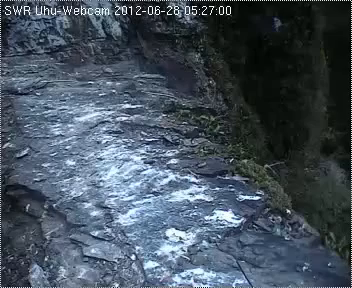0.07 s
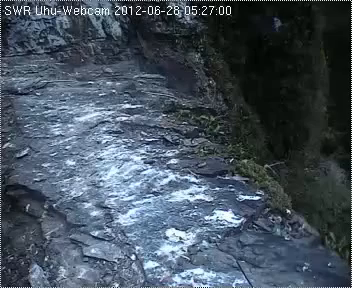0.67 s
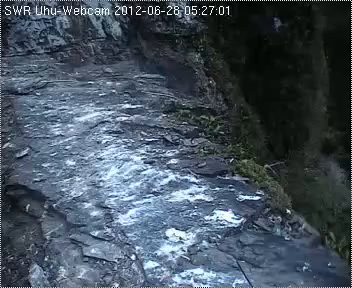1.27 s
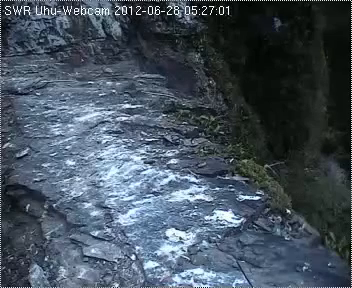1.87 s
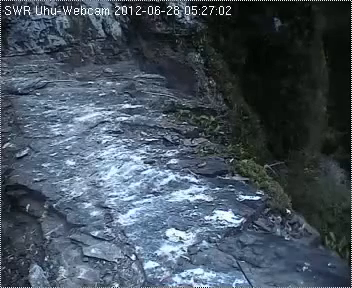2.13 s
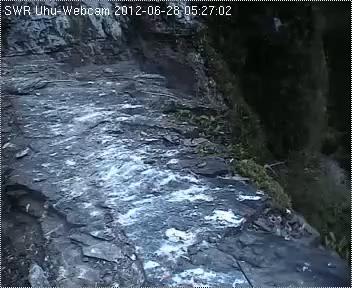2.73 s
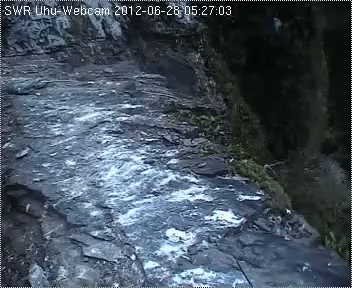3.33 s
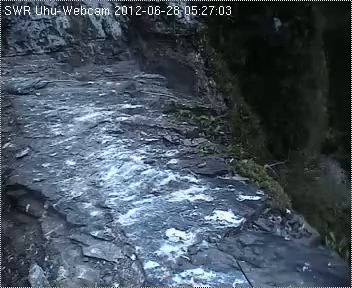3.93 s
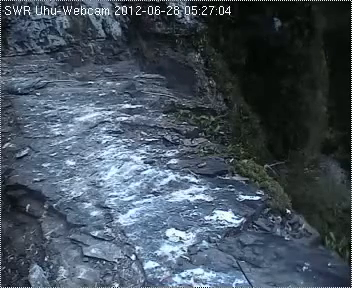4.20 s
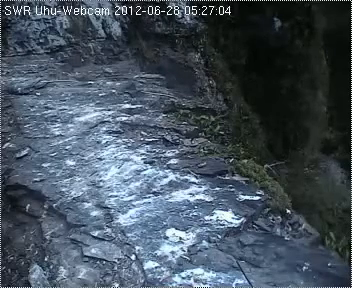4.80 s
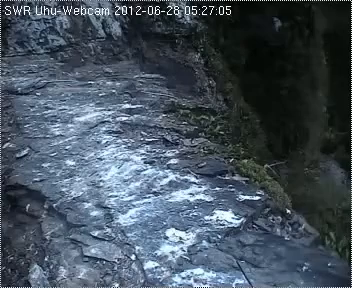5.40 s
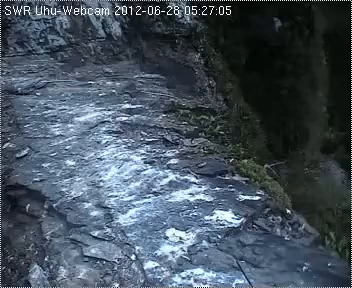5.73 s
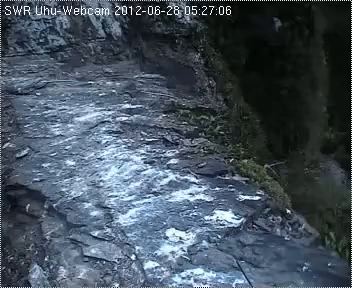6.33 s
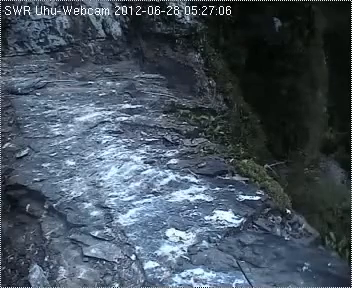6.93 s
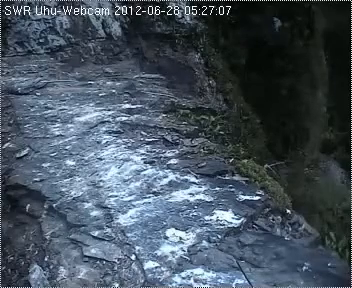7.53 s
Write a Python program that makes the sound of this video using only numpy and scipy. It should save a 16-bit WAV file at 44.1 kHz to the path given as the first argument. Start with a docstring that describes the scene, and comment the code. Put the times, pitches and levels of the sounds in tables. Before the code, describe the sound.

An owl gives one loud rasping screech and a softer hiss among small chirping birds, over steady rushing air and hum.

```python
"""A steady rush of air and mains hum, with distant song, on a rock ledge above a forest before dawn.
Two small birds repeat falling chirps that echo off the rock; faint owl rasps come from further off.
Midway a large owl gives one loud screech that overloads the microphone, then a softer hiss.
Owl calls are turbulent air, chopped by the syrinx and ringing in the throat; chirps and song are
gliding sines. A few scratchy ticks come near the end."""
import sys
import numpy as np
from scipy import signal
from scipy.fft import rfft, irfft
from scipy.io import wavfile

SR = 44100
rng = np.random.default_rng(int(sys.argv[2]) if len(sys.argv) > 2 else 0)


def dump_mix(stems):
    """Bounce the given channels to the path in sys.argv[1] as a 16-bit WAV at rate SR."""
    frames = np.atleast_2d(stems).T  # one column per channel
    limited = np.clip(frames, -1, 1)  # hard clip at full scale
    pcm = np.round(limited * 32767).astype(np.int16)
    wavfile.write(sys.argv[1], SR, pcm)


N = 337806
TIME = np.arange(N) / SR
FREQ_HZ = np.arange(N // 2 + 1) * SR / N
RASP_RISE_S, RASP_FALL_S = .067, .124

# Small birds' chirps. Each row: start in seconds, kind, held pitch in Hz, step down in Hz,
# length in seconds, relative level in dB.
CHIRPS = [(.594, "held", 3960, 30, .072, -36), (.93, "stepped", 5310, 1920, .083, -31),
          (1.324, "held", 4130, 100, .11, -34), (1.738, "held", 4680, 440, .088, -36),
          (2.153, "flat", 3820, 90, .097, -31), (2.546, "stepped", 5280, 1970, .086, -31.5),
          (2.97, "held", 3850, 20, .092, -29), (3.394, "stepped", 5080, 1680, .106, -34.5),
          (4.231, "held", 5060, 150, .056, -27.8), (4.602, "held", 4930, 150, .055, -32),
          (4.729, "flat", 4340, 30, .046, -32.5), (5.089, "held", 4970, 100, .055, -31),
          (5.104, "slurred", 4060, 500, .088, -34.5), (5.43, "slurred", 4030, 250, .078, -34),
          (5.467, "lifted", 4200, 1150, .097, -32.5), (5.746, "slurred", 4020, 520, .086, -32),
          (5.893, "held", 4890, 40, .046, -31), (6.029, "flat", 4320, 60, .044, -29.5),
          (6.093, "slurred", 4680, 530, .078, -33.8), (6.376, "stepped", 5550, 2250, .078, -32.5),
          (6.458, "slurred", 4660, 600, .08, -36), (6.787, "lifted", 4150, 820, .093, -30.5),
          (7.145, "lifted", 4500, 1050, .072, -37), (7.202, "held", 4950, 40, .061, -28),
          (7.521, "slurred", 4590, 750, .084, -37), (7.548, "stepped", 5420, 1960, .104, -34.5)]


def from_db(db):
    return 10 ** (np.asarray(db) / 20)


def unit_rms(x):
    return x / np.sqrt(np.mean(x ** 2) + 1e-20)


def drift(rate_hz):
    """Smooth random wander, rms 1."""
    return unit_rms(irfft(rfft(rng.standard_normal(N)) / (1 + (FREQ_HZ / rate_hz) ** 2), N))


def bumps(rows, rise_s, fall_s):
    """Gain of events that swell to a rounded peak and die away."""
    return sum(from_db(db) * np.exp(-((TIME - peak_s) / np.where(TIME < peak_s, rise_s, fall_s)) ** 2)
               for peak_s, db in rows)


def coloured(x, spectrum):
    """Shape x by (Hz, dB) points, rolling off beyond the ends; rms 1."""
    hz, db = np.transpose(spectrum)
    f = np.maximum(FREQ_HZ, 1)
    skirts = np.minimum(f / hz[0], 1) ** 3 * np.minimum(hz[-1] / f, 1) ** 4
    gain = from_db(np.interp(np.log(f), np.log(hz), db)) * skirts
    return unit_rms(irfft(rfft(x) * gain, N))


def resonate(x, hz, width_hz):
    """Two-pole resonance, peak gain 1."""
    r = np.exp(-np.pi * width_hz / SR)
    feedback = [1, -2 * r * np.cos(2 * np.pi * hz / SR), r * r]
    return signal.lfilter(np.array([1, 0, -1]) * (1 - r * r) / 2, feedback, x)


def air_rush():
    """Steady low rush of air with hollow resonances and a fine hiss on top."""
    # Spectra of rush and hiss. Each row: frequency in Hz, relative density in dB.
    rush_spectrum = [(25, -15.5), (45, -9), (65, 6.5), (90, 0), (130, 2.5), (175, 2.5), (240, 0.5),
                     (360, -2.5), (470, -5), (700, -8.5), (1100, -7), (1400, -11.5), (1800, -13.5),
                     (3200, -14.5)]
    top_spectrum = [(2500, -10), (3300, -3.5), (4300, -3), (5500, -3), (7000, -5.5), (8000, -6.5)]
    # Hollow resonances. Each row: centre in Hz, width in Hz, relative gain in dB.
    hollows = [(296, 32, -0.5), (466, 26, 1.5), (626, 12, -2), (844, 7.5, -8), (1099, 24, -7.5),
               (1486, 28, -8.5), (1908, 26, -7.5)]
    rush = from_db(-33.1 + .49 * drift(3)) * coloured(rng.standard_normal(N), rush_spectrum)
    air = rng.standard_normal(N)
    hollow = unit_rms(sum(from_db(db) * resonate(air, hz, width_hz) for hz, width_hz, db in hollows))
    top = coloured(rng.standard_normal(N), top_spectrum)
    return rush + from_db(-41.5) * hollow + from_db(-45.2) * top


def gusts():
    """Light gusts rumble, building faster than they die."""
    # Each row: peak time in seconds, level in dB.
    peaks = [(.6, -32.5), (3.7, -36), (4.99, -31.5)]
    # Each row: frequency in Hz, relative density in dB.
    spectrum = [(50, -15.5), (66, 7.5), (90, -4.5), (125, -3), (180, -13.5), (320, -22.5)]
    return bumps(peaks, rise_s=.19, fall_s=.32) * coloured(rng.standard_normal(N), spectrum)


def drone(hz=217, width_hz=32, floor_db=-39.5):
    """Low wavering band of noise, steady but for brief swells."""
    # Each row: peak time in seconds, level in dB.
    swells = [(.4, -35.5), (1.42, -32), (3.53, -29), (4.52, -31.5), (5.3, -33.5), (6.14, -32), (6.78, -35)]
    gain = np.hypot(from_db(floor_db), bumps(swells, rise_s=.1, fall_s=.1))
    band = resonate(rng.standard_normal(N), hz, width_hz)
    return gain * unit_rms(resonate(band, hz, width_hz))


def mains_hum():
    """Mains fundamental and third harmonic."""
    # Each row: frequency in Hz, rms level in dB.
    partials = [(50, -30.5), (150, -37.4)]
    return sum(np.sqrt(2) * from_db(db) * np.sin(2 * np.pi * (hz * TIME + rng.random()))
               for hz, db in partials)


def forest(x, t60_s):
    """Diffuse tail scattered back by trees and cliff."""
    t = TIME[:SR]
    tail = rng.standard_normal(SR) * from_db(-60 * t / t60_s) * (1 - np.exp(-t / .011))
    return signal.fftconvolve(x, tail / np.linalg.norm(tail))[:N]


def faint_song(count=90):
    """Note rows: a few clear notes over a random far chorus, the higher the fainter; the short falls at 0.72,
    6.21 and 6.58 s are the small birds' own after-notes."""
    # Each row: start in seconds, length in seconds, start and end pitch in Hz, relative level in dB.
    clear_notes = [(.17, .21, 3780, 3940, -48), (.33, .11, 3130, 3120, -43), (.48, .1, 4980, 4930, -48),
                   (.68, .047, 6070, 6400, -46), (.72, .035, 5740, 4700, -43),
                   (4.88, .088, 2850, 3350, -43), (6.21, .025, 4750, 4400, -44),
                   (6.58, .025, 4740, 4200, -41), (6.63, .06, 4210, 3920, -43),
                   (6.73, .074, 3550, 3620, -44), (6.94, .077, 3580, 3160, -44),
                   (7.12, .081, 3600, 3680, -43), (7.4, .11, 3300, 2900, -39)]
    when, length, octaves, glide, level = rng.random((count, 5)).T
    hz = 2700 * 2 ** octaves
    db = -52 + 3 * level - 5 * octaves
    chorus = zip(when * (TIME[-1] - .15), .05 + .1 * length, hz, hz * (.94 + .12 * glide), db)
    return list(clear_notes) + list(chorus)


def faint_notes(rows):
    """Thin, wavering glides, blurred by the trees."""
    notes = np.zeros(N)
    waver = 1 + .012 * drift(31)
    for start_s, length_s, from_hz, to_hz, db in rows:
        at = np.flatnonzero((TIME >= start_s) & (TIME < start_s + length_s))
        phase = 2 * np.pi * np.cumsum(np.linspace(from_hz, to_hz, len(at)) * waver[at]) / SR
        notes[at] += from_db(db) * signal.windows.tukey(len(at), .5) * np.sin(phase)
    return notes * from_db(2.5 + 3 * drift(40)) + forest(notes, t60_s=.4)


def small_birds(rise_s=.013, fade_s=.022, lift_s=.013, break_s=.006, break_db_per_octave=-9):
    """Each chirp swoops down to a held note, may lift a little, then steps down as it fades."""
    # Each row, by kind: top pitch in Hz, swoop in seconds, step position as a share of the length,
    # step time in seconds, lift in Hz, rock-bound over direct sound in dB.
    kinds = { "held": (6850, .0105, .78, .018, 0, -5), "flat": (6300, .011, .8, .018, 0, -9),
             "stepped": (7050, .0095, .62, .011, 130, -6), "lifted": (6700, .014, .84, .014, 430, -4),
             "slurred": (6000, .0115, 1.02, .018, 0, -19), }
    direct, to_rock = np.zeros(N), np.zeros(N)
    waver = 1 + .0066 * drift(70)
    flicker = from_db(1.7 * drift(60))
    for start_s, kind, held_hz, step_hz, length_s, db in CHIRPS:
        top_hz, swoop_s, step_share, step_s, lift_hz, echo_db = kinds[kind]
        at = np.flatnonzero((TIME >= start_s) & (TIME < start_s + length_s + fade_s / 2))
        t = TIME[at] - start_s
        since_step_s = t - step_share * length_s
        hz = held_hz + (top_hz - held_hz) * np.exp(-(t / swoop_s) ** 2)
        hz += lift_hz * np.exp(-(since_step_s / lift_s + 1) ** 2)
        hz -= step_hz * (1 + np.tanh(since_step_s / step_s)) / 2
        envelope = np.minimum(t / rise_s, 1) * np.clip((length_s + fade_s / 2 - t) / (2 * fade_s), 0, 1)
        # The voice breaks just before the step.
        break_db = break_db_per_octave * np.log2(held_hz / (held_hz - step_hz))
        envelope *= from_db(break_db * np.exp(-((since_step_s + step_s) / break_s) ** 2))
        phase = 2 * np.pi * np.cumsum(hz * waver[at]) / SR
        note = from_db(db) * envelope * flicker[at] * np.sin(phase)
        # A bird facing the rock sends less straight to the microphone.
        rock_ratio = from_db(echo_db)
        direct[at] += note / np.hypot(1, rock_ratio)
        to_rock[at] += note * rock_ratio / np.hypot(1, rock_ratio)
    echoes = from_db(-1) * rock_echoes(to_rock) + from_db(-2) * forest(to_rock, t60_s=.18)
    return from_db(3.5) * (direct + echoes)


def rock_echoes(x):
    """Close reflections off the rock faces."""
    # Each row: delay in seconds, relative gain in dB.
    reflections = [(.0021, -1), (.0053, 2.5), (.0097, -19.5), (.019, -7), (.034, -22)]
    return sum(from_db(db) * np.interp(TIME - delay_s, TIME, x, left=0) for delay_s, db in reflections)


def rasp(air, throat, ring_db, flutter_hz, roughness):
    """Turbulent air, chopped by the unevenly fluttering syrinx, rings in the throat; rms 1."""
    cycles = np.cumsum(flutter_hz * from_db(3.2 * drift(89.84))) / SR
    puffs = rng.standard_normal(N) * np.exp(roughness * np.cos(2 * np.pi * cycles))
    ringing = sum(from_db(db) * resonate(puffs, hz, width_hz) for hz, width_hz, db in throat)
    ringing = coloured(ringing, [(900, 4.5), (3000, -3.5), (4300, -8.5)])
    return unit_rms(coloured(puffs, air) + from_db(ring_db) * ringing)


def far_rasps():
    """Faint owl rasps from further off."""
    # Each row: peak time in seconds, level in dB.
    peaks = [(1.18, -46), (2.188, -29.7), (5.932, -25.3), (7.47, -37)]
    # Breath spectrum. Each row: frequency in Hz, relative density in dB.
    air = [(1400, -15), (2000, -11), (2380, 2.5), (2550, 0), (2900, -6.5), (3300, -1), (3800, -13.5),
           (5500, -16), (7500, -36.5)]
    # Resonances. Each row: centre in Hz, width in Hz, relative gain in dB.
    throat = [(2380, 40, 3), (2630, 40, -4), (2900, 180, -6)]
    voice = rasp(air, throat, ring_db=-5, flutter_hz=205, roughness=.25)
    return bumps(peaks, RASP_RISE_S, RASP_FALL_S) * voice


def after_notes(long_chirp_s=.087, delay_s=.122, length_s=.036, from_hz=4250, to_hz=4060):
    """Note rows: a faint falling note follows each long chirp."""
    return [(start_s + delay_s, length_s, from_hz, to_hz, db - 11)
            for start_s, *_, chirp_s, db in CHIRPS if chirp_s > long_chirp_s]


def owl_screech(jitter=.0185, hardening=1.1):
    """Loud rasp with a jittery whistle in it; the call hardens as the effort peaks."""
    # Each row: time in seconds, effort in dB.
    effort_curve = [(3.69, -41), (3.7, -34), (3.812, -9), (3.866, -6), (4.012, -12), (4.054, -21),
                    (4.075, -32)]
    # Each row: time in seconds, fundamental in Hz, whistle's relative level in dB.
    whistle_curve = [(3.69, 935, 4), (3.73, 935, -7), (3.78, 970, -8), (3.83, 1036, -1), (3.89, 1024, -3),
                     (3.95, 1078, -9), (4.02, 1040, -10), (4.048, 945, 3), (4.085, 930, -6)]
    # Breath spectrum. Each row: frequency in Hz, relative density in dB.
    air = [(300, -23), (700, -24), (1050, -19), (1550, -18), (2000, -12), (2400, -6), (3100, -8.5),
           (3700, -9), (4400, -14), (5500, -26), (7500, -31.5)]
    # Resonances. Each row: centre in Hz, width in Hz, relative gain in dB.
    throat = [(1073, 50, -15), (1160, 35, -13), (2080, 34, -18), (2154, 10, -3), (2850, 23, -2),
              (2990, 43, 0), (3114, 45, 4), (3275, 26, 7.5), (3688, 22, 1)]
    effort_s, effort_db = np.transpose(effort_curve)
    outside_s = np.abs(TIME - np.clip(TIME, effort_s[0], effort_s[-1]))
    effort = from_db(np.interp(TIME, effort_s, effort_db)) * np.exp(-outside_s / .0072)
    whistle_s, pitch_hz, whistle_db = np.transpose(whistle_curve)
    hz = np.interp(TIME, whistle_s, pitch_hz) * (1 + jitter * drift(219.4))
    phase = 2 * np.pi * np.cumsum(hz) / SR
    # Harmonic 2 carries the whistle; its neighbours come in with effort.
    neighbours = sum(from_db(db) * np.sin(k * phase) for k, db in [(1, -7), (3, -5), (4, -16)])
    whistle = np.sin(2 * phase) + neighbours * effort / effort.max()
    whistle_gain = from_db(np.interp(TIME, whistle_s, whistle_db))
    whistle *= whistle_gain * from_db(3.4 * drift(120))
    breath = from_db(-.5) * rasp(air, throat, ring_db=.5, flutter_hz=170.6, roughness=.45)
    voice = from_db(-1) * (breath + whistle) / np.hypot(1, whistle_gain / 2)
    return voice * effort * (1 + hardening * effort ** 2)


def owl_hiss():
    """Softer breath after the screech, with little flutter."""
    # Each row: peak time in seconds, level in dB.
    peaks = [(4.405, -16.7)]
    # Breath spectrum. Each row: frequency in Hz, relative density in dB.
    air = [(820, -61), (1400, -54), (1870, -9), (2220, -21), (2680, -7), (3100, -4.5), (3380, -2),
           (4370, -16), (4630, -12.5), (6020, -16), (8000, -27.5), (10400, -58), (17600, -120)]
    # Resonances. Each row: centre in Hz, width in Hz, relative gain in dB.
    throat = [(2345, 45, -12), (2590, 25, -1.5), (2850, 74, -8.5), (3340, 31, -5), (3790, 46, -6),
              (4230, 30, -2), (4400, 22, -3)]
    voice = rasp(air, throat, ring_db=-.5, flutter_hz=207.5, roughness=.2)
    return bumps(peaks, RASP_RISE_S, RASP_FALL_S) * voice


def ticks(width_s=.0083):
    """Brief scratchy noise bursts."""
    # Each row: peak time in seconds, level in dB.
    peaks = [(6.523, -35), (7.29, -30.5), (7.499, -34)]
    # Each row: frequency in Hz, relative density in dB.
    spectrum = [(1200, -24), (1900, 3), (2400, 2), (3200, -4), (4200, -11), (6000, -25)]
    return bumps(peaks, width_s, width_s) * coloured(rng.standard_normal(N), spectrum)


def scene():
    """Owls, small birds, ticks and background at one microphone."""
    owls = owl_hiss() + far_rasps() + owl_screech()
    owls += from_db(-30) * forest(owls, t60_s=.8)
    birds = small_birds() + faint_notes(faint_song() + after_notes())
    return (owls + birds + ticks() + air_rush() + gusts() + drone() + mains_hum())[None]


def record(dry, ceiling=.73, switch_on_s=.0713):
    """Narrow-band input, switched on just after the start; clips hard, then the top is cut."""
    # Input response. Each row: frequency in Hz, gain in dB.
    response = [(7200, 0.5), (7900, -6.5), (8400, -10.5), (8900, -15.5), (9400, -36), (10500, -62.5)]
    narrow = irfft(rfft(dry[0]) * from_db(np.interp(FREQ_HZ, *np.transpose(response))), N)
    clipped = np.clip(narrow, -ceiling, ceiling) * (TIME >= switch_on_s)
    softened = signal.sosfiltfilt(signal.butter(6, 10300, fs=SR, output="sos"), clipped)
    fade_out = np.minimum((TIME[-1] - TIME) / .002, 1)
    return signal.sosfiltfilt(signal.butter(20, 12000, fs=SR, output="sos"), softened * fade_out)[None]


dry = scene()
out = record(dry)
dump_mix(out)
```